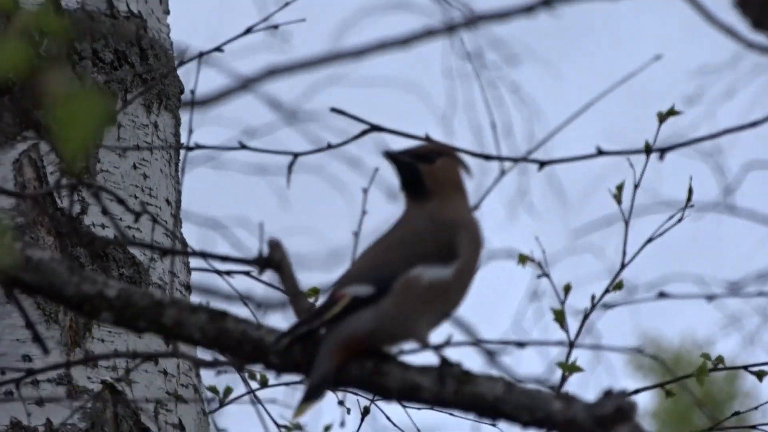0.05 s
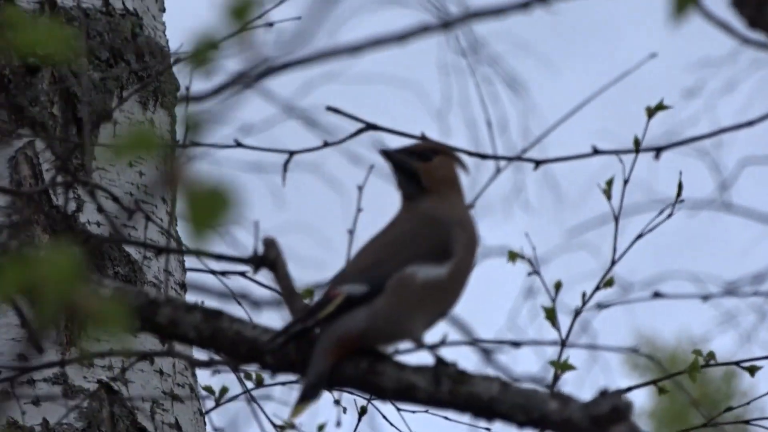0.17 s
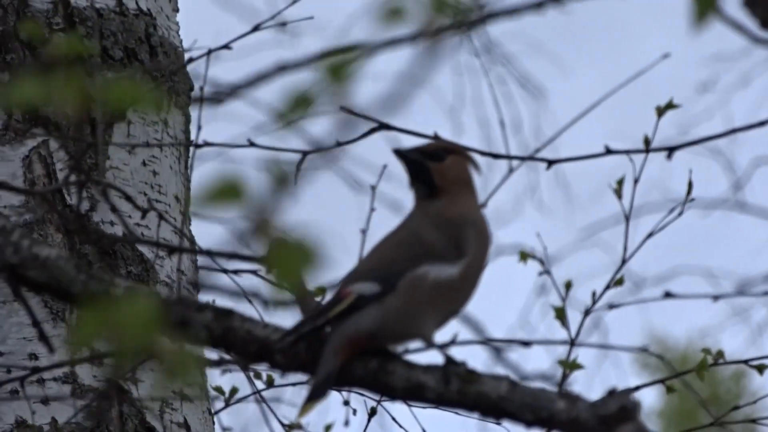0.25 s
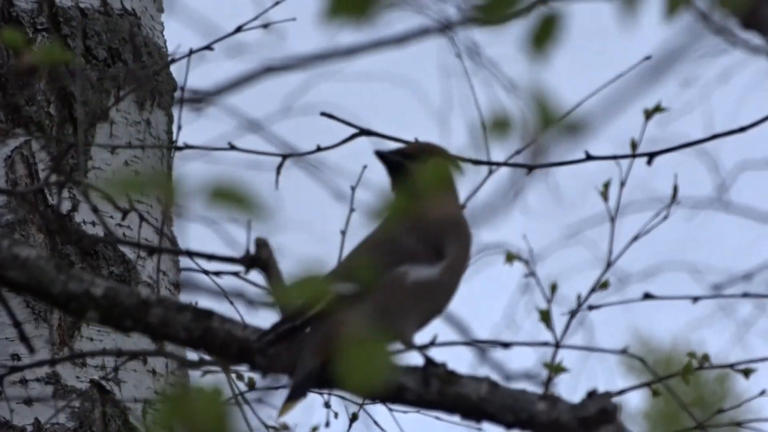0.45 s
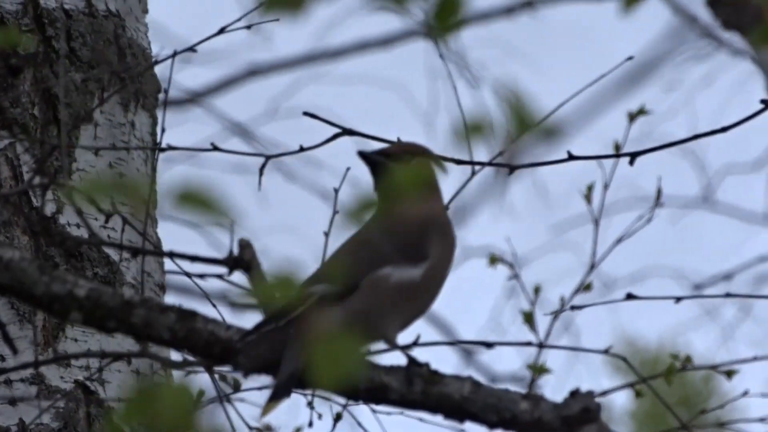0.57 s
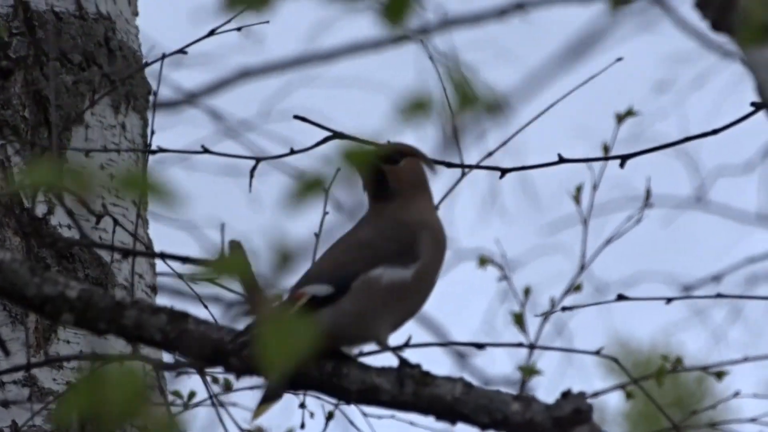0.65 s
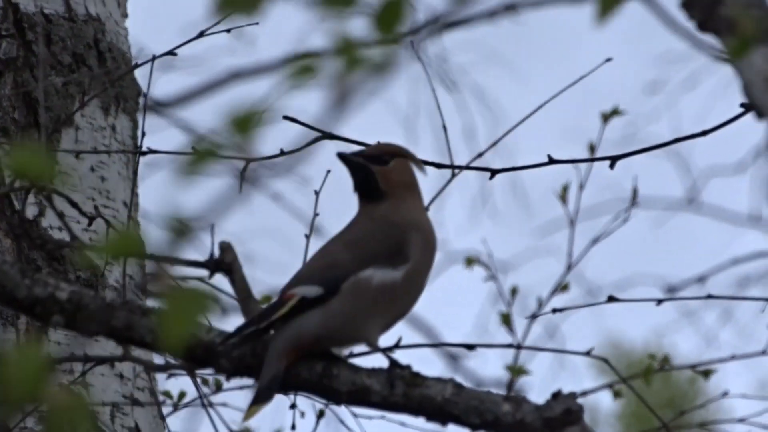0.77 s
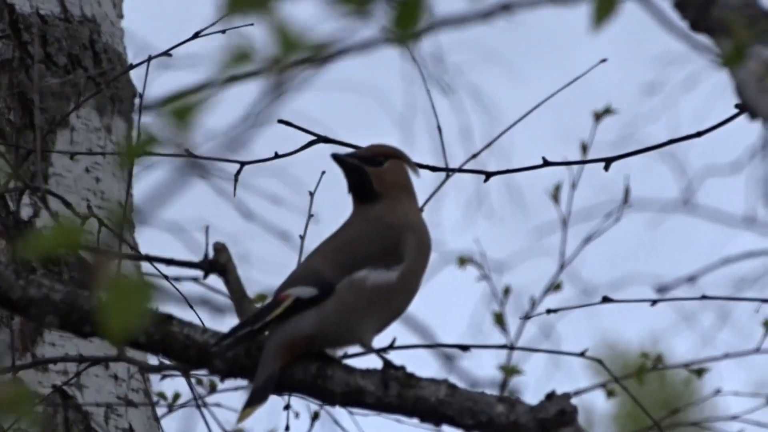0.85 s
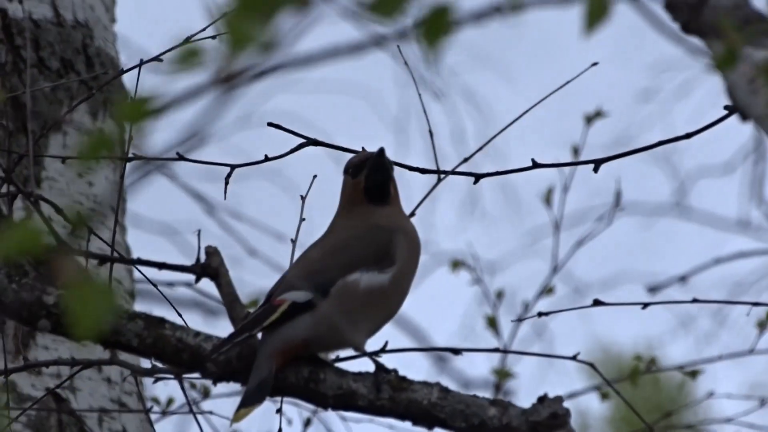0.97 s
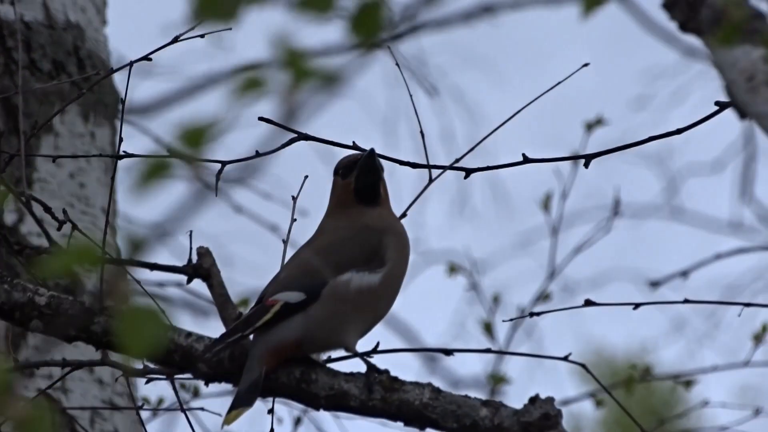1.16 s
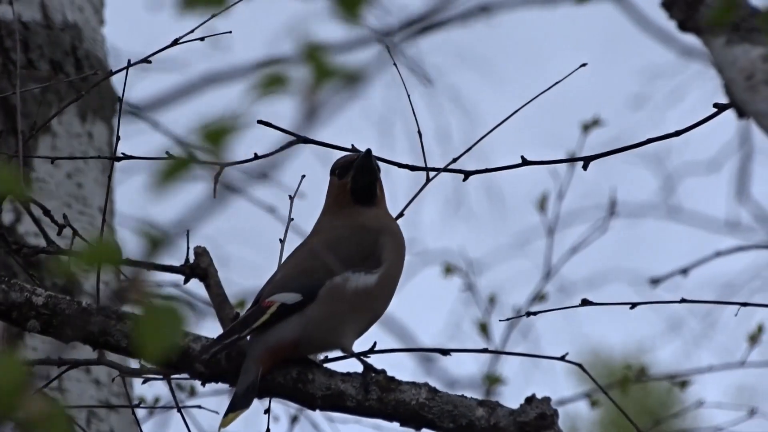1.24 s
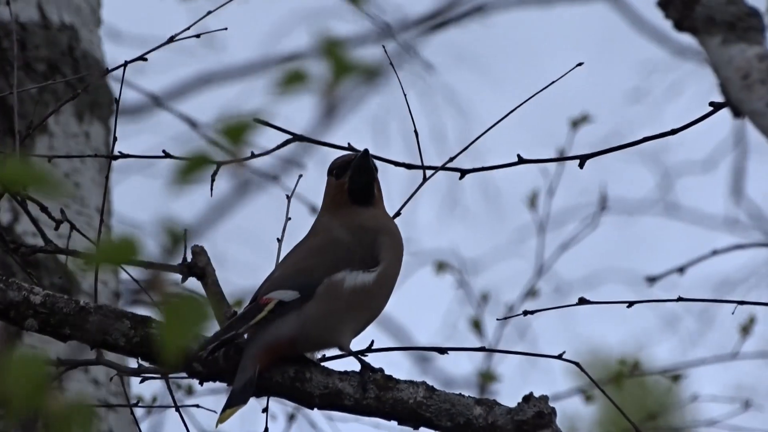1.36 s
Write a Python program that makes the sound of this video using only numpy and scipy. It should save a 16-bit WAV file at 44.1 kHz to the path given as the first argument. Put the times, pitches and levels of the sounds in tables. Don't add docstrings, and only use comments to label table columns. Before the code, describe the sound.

A small perched bird gives six thin, high, rapidly pulsed trills, at about 0.5, 0.66, 0.82, 1.0, 1.15 and 1.3 s, each sagging slightly with a light woodland echo. Soft wind thumps open; a strong gust buffets the microphone from 0.25 to 0.6 s, then eases to scattered bumps. From 0.4 s fainter birds chip and buzz lower. Casing clicks near 0.57 s; distant rumble and hiss persist.

```python
import sys
import numpy as np
from scipy import signal
from scipy.fft import rfft, irfft, next_fast_len
from scipy.io import wavfile
from scipy.ndimage import uniform_filter1d, map_coordinates

SR = 44100
rng = np.random.default_rng(int(sys.argv[2]) if len(sys.argv) > 2 else 0)


def master(y):
    cut = np.clip(np.atleast_2d(y).T, -1, 1)
    pcm = np.round(cut * 32767)
    wavfile.write(sys.argv[1], SR, pcm.astype(np.int16))


def ratio_of_db(decibels):
    return 10 ** (np.asarray(decibels, float) / 20)


N = 61739
LEFT_RIGHT = np.array([[1], [-1]])


def unit(x):
    return x / np.sqrt(np.mean(x ** 2) + 1e-20)


def along(points, hz):
    f, value = np.transpose(points)
    return np.interp(np.log(hz + 1), np.log(f + 1), value)


def wobble(rate):
    knots = rng.standard_normal(int(N * rate / SR) + 4)
    return map_coordinates(knots, [np.arange(N) * rate / SR])


def filtered(x, response):
    m = next_fast_len(x.shape[-1] + 8192)
    spectrum = rfft(x, m) * response(np.fft.rfftfreq(m, 1 / SR))
    return irfft(spectrum, m)[..., :x.shape[-1]]


def rush(spectrum, side, patchy_db):
    z = signal.stft(rng.standard_normal((2, N)), nperseg=512)[2]
    field = uniform_filter1d(rng.standard_normal(z.shape[1:]), size=6, axis=0)
    field = uniform_filter1d(field, size=8, axis=1)
    pair = signal.istft(z * ratio_of_db(patchy_db * unit(field)), nperseg=512)[1][:, :N]

    def colour(hz):
        return ratio_of_db(along(spectrum, hz)) * [np.ones_like(hz), ratio_of_db(along(side, hz))]

    mid, dif = filtered(pair, colour)
    return np.array([mid + dif, mid - dif]) / np.sqrt(np.mean(mid ** 2))


def pan(db):
    return ratio_of_db(db / 2 * LEFT_RIGHT)


def tone(hz):
    return np.sin(2 * np.pi * (np.cumsum(hz) / SR + rng.random()))


def arch(t, length):
    return np.sqrt(np.abs(np.sin(np.pi * t / length))) * (t < length)


def wood(x):
    t60_s, wash_db, side = .95, -8, .5
    t = np.arange(SR // 2) / SR
    tail = rng.standard_normal((2, len(t))) * ratio_of_db(-60 * t / t60_s) * (1 - np.exp(-t / .015))
    tail = tail[0] + side * tail[1] * LEFT_RIGHT
    return ratio_of_db(wash_db) * signal.fftconvolve(x, tail / np.linalg.norm(tail[0]), axes=1)[:, :N]


# start t/s, length t/s, level/dB, end pitch f/Hz, start above it f/Hz
TRILL_NOTES = [
    (.4995, .04, -49.5, 6150, 300),
    (.6572, .063, -42, 6120, 380),
    (.8185, .062, -40, 6120, 700),
    (.9915, .05, -39.5, 6090, 400),
    (1.1445, .066, -42, 6010, 950),
    (1.308, .066, -37.5, 6120, 620),
]


def trills(clock):
    rate_hz, slowing_hz_per_s = 150, 300
    rise_s, fall_s = .028, .012
    sag_s, drift_hz_per_s, pulse_drop_hz = .012, 1500, 700
    out = np.zeros((2, N))
    for start, length, db, end_hz, above_hz in TRILL_NOTES:
        t = np.clip(clock - start, 0, length)
        cycle = (t * (rate_hz - slowing_hz_per_s * t / 2)) % 1
        shape = np.clip(t / rise_s, 0, 1) ** 0.72 * np.clip((length - t) / fall_s, 0, 1) ** 0.7
        pulses = np.sin(np.pi * cycle) ** 1.4 * ratio_of_db(1.2 * wobble(150))
        pitch = end_hz - 20 + above_hz * np.exp(-t / sag_s) - drift_hz_per_s * t
        pitch = pitch + pulse_drop_hz * (1 - cycle) ** 8 + 25 * wobble(200)
        note = pan(-1.9) * ratio_of_db(db + 6) * shape * pulses * tone(pitch)
        out += note + wood(note)
    return out


# end t/s, level/dB, sweep level under the hook/dB
CHIP_CALLS = [
    (.42, -59, -3),
    (.557, -54.5, -4),
    (.686, -54, -6),
    (.828, -54, -9),
    (.96, -53.5, -12),
    (1.08, -55.5, -1),
]
# start t/s, length t/s, level/dB, pitch f/Hz
BUZZ_CALLS = [
    (.427, .028, -60, 3150),
    (.598, .03, -54, 3300),
    (.768, .026, -57.5, 3330),
    (.93, .03, -56.5, 3300),
    (1.085, .035, -62, 3300),
    (1.248, .042, -56, 3380),
    (1.293, .025, -61, 3750),
    (1.333, .03, -62, 3450),
]


def far_birds(clock):
    sweep_top_hz, sweep_fall_hz_per_s, sweep_s, lead_s = 5350, 58000, .017, .041
    hook_end_hz, hook_above_hz, hook_sag_s, hook_s = 3820, 800, .0028, .016
    buzz_rate_hz, buzz_rise_hz_per_s = 243, 5000
    chips, buzzes = np.zeros(N), np.zeros(N)
    for end, db, sweep_db in CHIP_CALLS:
        t = np.clip(clock - end + lead_s, 0, sweep_s)
        sweep = tone(sweep_top_hz - sweep_fall_hz_per_s * t + 40 * wobble(200))
        chips += ratio_of_db(db + 4 + sweep_db + 1.5 * wobble(150)) * arch(t, sweep_s) * sweep
        t = np.clip(clock - end + hook_s, 0, hook_s)
        hook = tone(hook_end_hz + hook_above_hz * np.exp(-t / hook_sag_s) + 40 * wobble(200))
        chips += ratio_of_db(db + 4) * arch(t, hook_s) * hook
    for start, length, db, hz in BUZZ_CALLS:
        t = np.clip(clock - start, 0, length)
        shape = arch(t, length) * np.sin(np.pi * buzz_rate_hz * t) ** 2
        pitch = hz + buzz_rise_hz_per_s * (t - length / 2) + 60 * wobble(90)
        pitch = pitch + 200 * np.sin(2 * np.pi * buzz_rate_hz * t)
        buzzes += ratio_of_db(db + 9) * shape * tone(pitch)
    both = pan(-3.8) * chips + pan(-1) * buzzes
    return both + ratio_of_db(-1) * wood(both)


PORT_LAG_S = 0.0013
# t/s, strength level/dB, flutter brightness/dB
GUST = [(0.0, -34.5, -6), (0.206, -28.5, -9), (0.235, -15.5, -7), (0.275, -7, -28), (0.298, -17, -8),
        (0.314, -16.5, -2), (0.376, -13, -21.5), (0.437, -17.5, -4), (0.458, -10, -19.5), (0.528, -19, -22),
        (0.618, -19.5, -18), (0.654, -27, -13), (0.7, -25, -21), (0.782, -41, 2), (0.906, -47, 1),
        (1.038, -29.5, -11), (1.238, -41, -8), (1.4, -24, -22)]
# peak t/s, peak level/dB, pitch f/Hz, cycles, rasp level under the peak/dB
EDDIES = [(.27, -18.5, 243, 4.8, 0.5), (0.292, -5.5, 68, 0.55, -41), (0.317, -14, 271, 2.1, -22),
          (0.356, -25, 172, 6.1, -31), (0.387, -16, 84, 4.3, -46), (0.411, -12.5, 197, 0.78, -10.5),
          (0.446, -18, 216, 3, -2.5), (0.461, -7, 96, 1.47, -20), (0.486, -13, 123, 0.41, -15),
          (0.51, -14, 65, 1.26, -18.5), (.565, -13, 80, 0.93, -15.5), (0.604, -18, 98.8, 2.4, -24),
          (0.701, -19.5, 60, 0.73, -40), (0.989, -20.5, 72, 0.79, -28), (1.042, -25, 75, 1, -40),
          (0.121, -19, 55.3, 0.57, -19), (0.158, -32, 69.6, 1.2, -44), (0.052, -25, 54, 1, -39),
          (.195, -23.5, 69.4, 0.79, -20), (.628, -25, 84.5, 1.5, -35), (.685, -24.5, 90, 0.73, -26),
          (1.07, -21, 59, 0.7, -22), (1.102, -27.5, 90, 1.5, -29), (1.2, -24, 75.5, 0.76, -36),
          (1.288, -29.5, 52.7, 2.2, -7.5), (1.327, -23.5, 64, 0.85, -25), (1.36, -23, 74, 1.15, -28),
          (1.396, -21, 122, 0.92, -22)]
# f/Hz, level/dB per Hz
BUFFET_COLOUR = [(10, -48), (30, 4), (60, -1), (100, 2), (160, -2.5), (300, -13.5), (400, -64), (660, -120)]
# f/Hz, level/dB per Hz
FLUTTER_COLOUR = [(150, -34), (250, 7), (400, 1), (700, -14.5), (1100, -22), (1600, -34), (2600, -90)]
# f/Hz, side over mid level/dB
WIND_WIDTH = [(30, -10), (60, -6), (150, 0), (300, 2), (600, 9), (1500, 9)]


def wind(clock):
    port_scatter = 0.15
    rasp_rise_s, rasp_lead_s = 0.0019, 0.005
    knots, strength_db, bright_db = np.transpose(GUST)
    gust_db = np.interp(clock, knots, strength_db)
    bright_db = np.interp(clock, knots, bright_db)
    out = ratio_of_db(gust_db - 9 + 2 * wobble(30)) * rush(BUFFET_COLOUR, WIND_WIDTH, patchy_db=1.5)
    rasp = ratio_of_db(1.12 * (gust_db + bright_db + 28.5) - 41.0 + 1.8 * wobble(44.9))
    chance = rng.standard_normal((len(EDDIES), 3))
    for (peak, db, hz, cycles, rasp_db), (phase, apart, lean) in zip(EDDIES, chance):
        t = clock - peak
        turn = np.pi * hz * PORT_LAG_S + port_scatter * apart / 2
        swell = ratio_of_db(db) * np.exp(-(2 * t * hz / cycles) ** 2)
        thump = np.cos(2 * np.pi * hz * t + 3 * phase + turn * LEFT_RIGHT)
        out += pan(0.51 * lean) * swell * thump
        since = np.maximum(t + rasp_lead_s, 0)
        decay = np.exp(-1.5 * since * hz / cycles)
        rasp = rasp + ratio_of_db(db + rasp_db) * (1 - np.exp(-since / rasp_rise_s)) * decay
    return out + rasp * rush(FLUTTER_COLOUR, WIND_WIDTH, patchy_db=0.0)


def surge(clock):
    peak_s, length_s, level_db = .261, .031, -9.5
    start_hz, rise_hz_per_s = 155, 950
    t = clock - peak_s
    hz = np.maximum(start_hz + rise_hz_per_s * t, 0)
    turn = np.pi * hz * PORT_LAG_S * LEFT_RIGHT
    uneven_db = 1.5 * np.array([wobble(62), wobble(62)])
    swell = ratio_of_db(level_db + uneven_db) * np.exp(-(t / length_s) ** 4)
    return swell * np.cos(2 * np.pi * np.cumsum(hz) / SR + turn)


# t/s, level/dB, length t/s, lowest f/Hz, highest f/Hz
CASE_TICKS = [
    (.5632, -41.5, .003, 4800, 16000),
    (.572, -45.5, .0045, 5500, 16000),
    (.566, -53, .014, 5000, 16000),
    (.570, -42, .009, 1250, 2600),
    (.626, -48.5, .0022, 9000, 15000),
    (.8275, -45, .0012, 6800, 8800),
    (.983, -52, .016, 7000, 16000),
    (.684, -56, .005, 9000, 13000),
    (1.13, -52, .002, 6000, 9000),
    (.597, -54, .002, 8000, 12000),
]
# t/s, level/dB, length t/s, lowest f/Hz, highest f/Hz
EDDY_RASPS = [
    (.160, -35, .002, 450, 1200),
    (.268, -31, .003, 500, 1600),
    (.318, -33, .003, 400, 900),
    (.445, -30, .003, 400, 1200),
]
# t/s, level/dB, pitch f/Hz, 60 dB decay t/s
BODY_RINGS = [
    (.563, -31.5, 1400, 0.06),
    (1.305, -25.5, 465, 0.08),
]


def camera(clock):
    out = np.zeros(N)
    for at, db, length, low_hz, high_hz in [*CASE_TICKS, *EDDY_RASPS]:
        def band(f):
            return 1 / np.sqrt((1 + (low_hz / (f + 1)) ** 8) * (1 + (f / high_hz) ** 14))

        grit = filtered(rng.standard_normal(N) * ratio_of_db(3 * wobble(700)), band)
        out += ratio_of_db(db) * np.exp(-((clock - at) / length) ** 2) * unit(grit)
    for at, db, hz, t60 in BODY_RINGS:
        t = np.maximum(clock - at, 0)
        ring = tone(hz * (1 + 0.012 * wobble(150)))
        out += ratio_of_db(db - 60 * t / t60) * (1 - np.exp(-t / 0.0017)) * ring
    return pan(-0.74) * out


# t/s, level/dB
TOWN_COURSE = [(0, 0), (.12, 1), (.5, -1), (.6, -3), (.71, -3.5), (.76, 1), (.92, -.5), (1.14, .5),
               (1.4, 0)]
# f/Hz, level/dB per Hz
TOWN_COLOUR = [(15, -41), (35, 16.5), (60, 2.5), (200, -5), (450, -3.5), (800, -4), (1300, -10),
               (1650, -21), (2000, -19), (3000, -36), (5000, -73)]
# f/Hz, level/dB per Hz
HISS_COLOUR = [(1290, -5), (2200, -2.5), (3970, -4), (4990, -3.5), (5930, -1.5), (7040, 0), (8580, -5.5),
               (11100, -3.5), (15600, -9)]
# f/Hz, side over mid level/dB
TOWN_WIDTH = [(60, -32), (130, -8), (290, -22), (640, -9), (1410, -5), (3100, -18), (6820, -10),
              (15000, -7)]
# f/Hz, side over mid level/dB
HISS_WIDTH = [(2000, 2.5), (4000, -3.5), (6500, -13), (9500, -2), (11500, -11), (13500, -10), (15500, -11)]
# f/Hz, left over right level/dB
LEAN = [(60, 1), (600, -2.5), (1400, -2.5), (3000, -1.7), (6000, 1.2), (10000, -5.5), (13000, 0.5)]


def background(clock):
    town_db = -36 + np.interp(clock, *np.transpose(TOWN_COURSE)) + .7 * wobble(60)
    town = ratio_of_db(town_db) * rush(TOWN_COLOUR, TOWN_WIDTH, patchy_db=1.1)
    hiss = ratio_of_db(-50.5 + 0.24 * wobble(5.4)) * rush(HISS_COLOUR, HISS_WIDTH, patchy_db=1.3)
    return filtered(town + hiss, lambda hz: ratio_of_db(along(LEAN, hz) / 2 * LEFT_RIGHT))


def scene():
    clock = np.arange(N) / SR
    birds = trills(clock) + far_birds(clock)
    return birds + wind(clock) + surge(clock) + camera(clock) + background(clock)


def roll_off(x):
    return signal.sosfilt(signal.butter(12, 15750, fs=SR, output="sos"), x)


def record(dry):
    bass_hz, ceiling, top_hz = 22, .9, 15750
    x = filtered(dry, lambda f: (1j * f / (bass_hz + 1j * f)) ** 2)
    x = x / (1 + np.abs(x / ceiling) ** 4) ** (1 / 4)
    mix = filtered(x, lambda f: f < top_hz)
    return roll_off(mix)


dry = scene()
out = record(dry)
master(out)
```